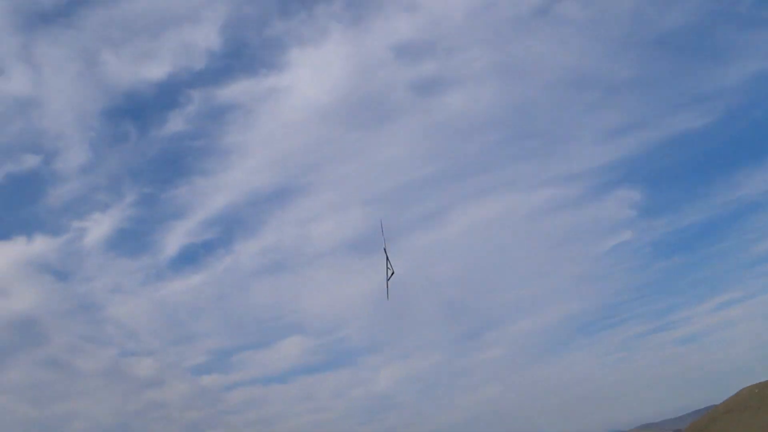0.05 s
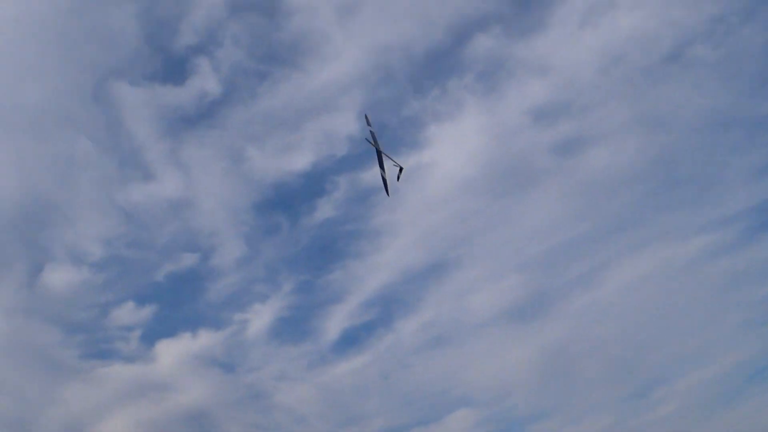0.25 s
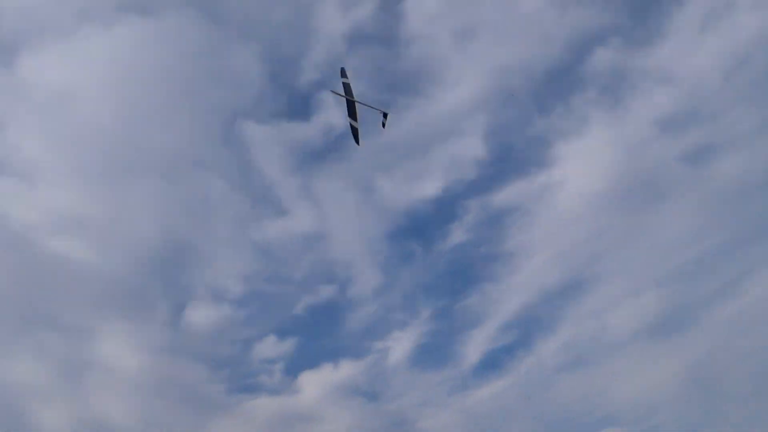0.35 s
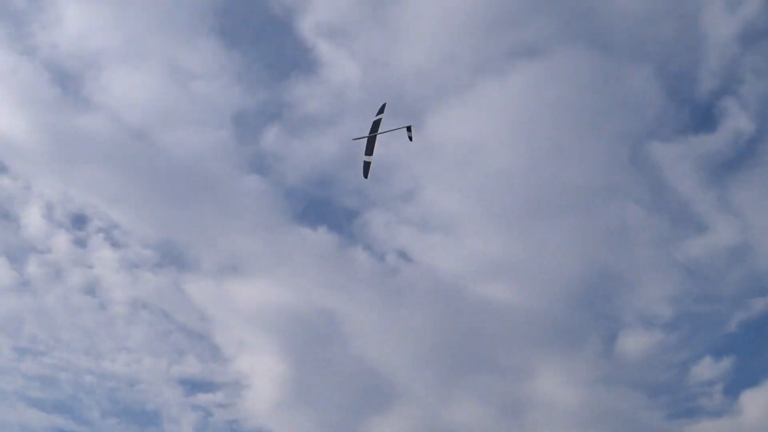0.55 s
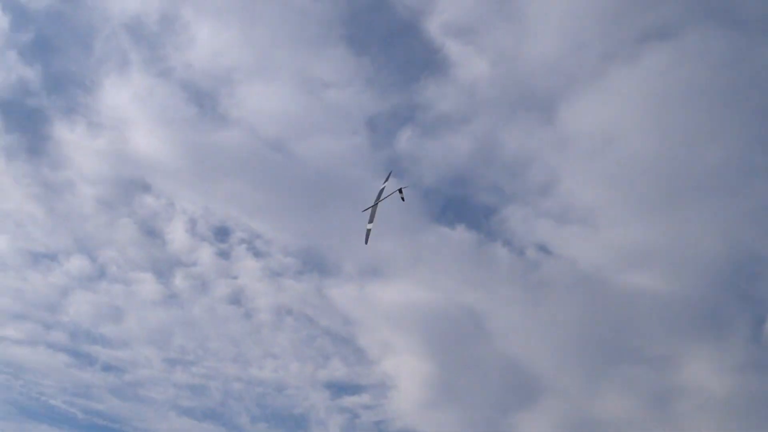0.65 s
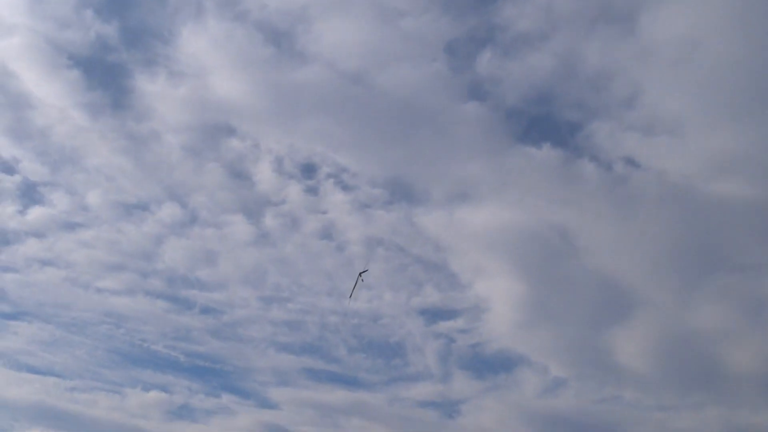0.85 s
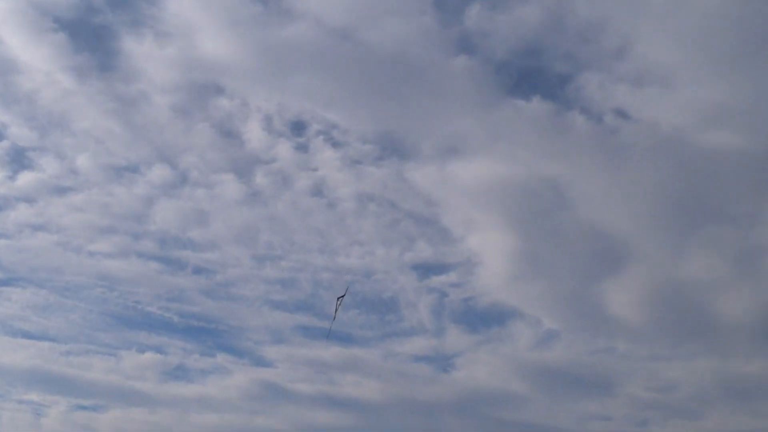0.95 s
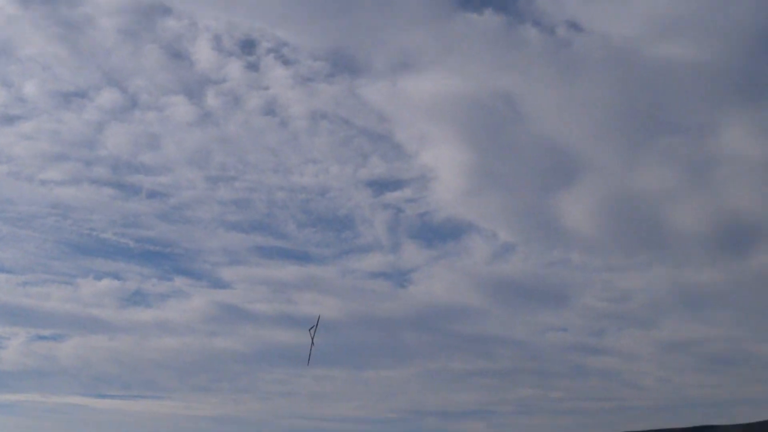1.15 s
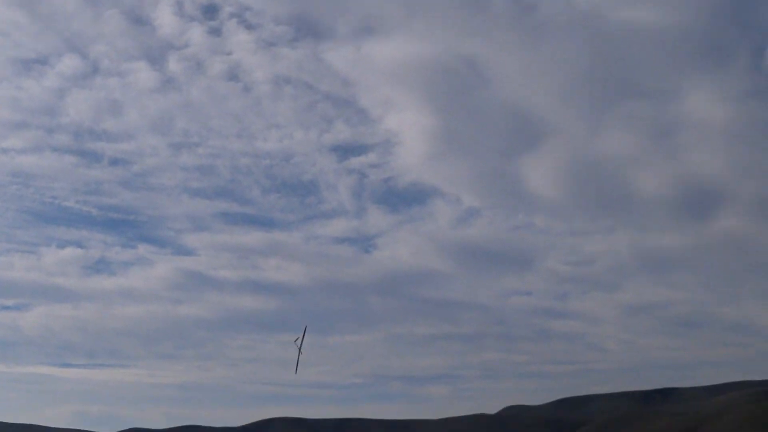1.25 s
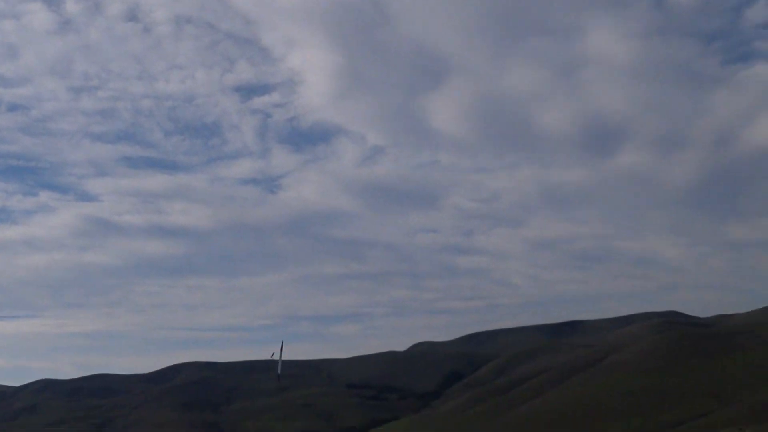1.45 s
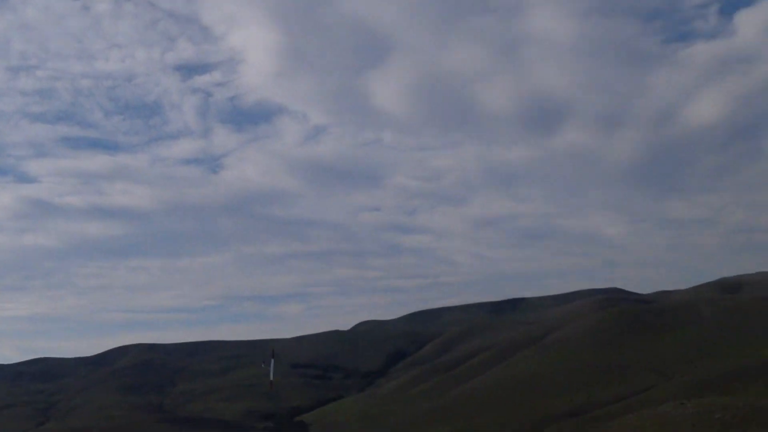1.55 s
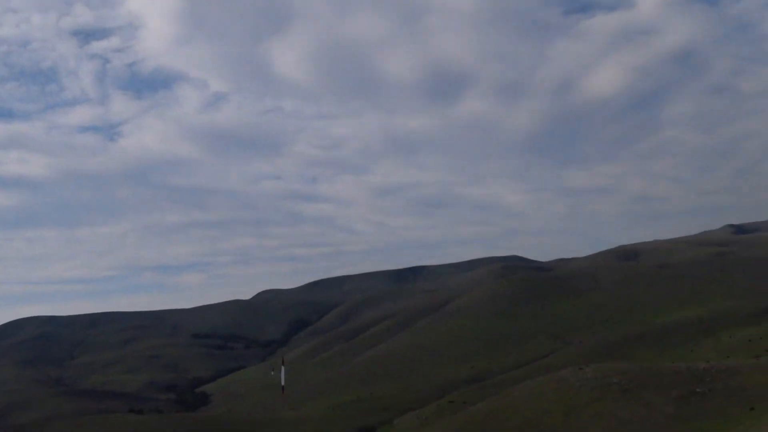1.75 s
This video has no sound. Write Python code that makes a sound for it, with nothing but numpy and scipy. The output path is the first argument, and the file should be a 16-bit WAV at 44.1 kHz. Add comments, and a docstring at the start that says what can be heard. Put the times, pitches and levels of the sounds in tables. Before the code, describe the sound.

A model glider sweeps close overhead with an airy hiss and faint whistles that sink in pitch and fade. Gusts flutter and thump on the microphone throughout, over soft hillside wind and a little rustling grass.

```python
"""A model glider sweeps close overhead: air hisses over its wings and rushes and whistles at their
edges, all sinking in pitch with the Doppler shift of the pass.
Gusts buffet the two microphone ports in short flutters, and single eddies thump on them.
Underneath lies a bed of wind on a grassy hill, with a few swells of rustling grass."""
import sys
import numpy as np
from scipy import signal
from scipy.fft import rfft, irfft
from scipy.io import wavfile
from scipy.ndimage import uniform_filter1d, map_coordinates

SR = 44100
rng = np.random.default_rng(int(sys.argv[2]) if len(sys.argv) > 2 else 0)


def wav_out(sig):
    """Save sig, one row per channel (or a flat mono array), as 16-bit PCM at SR to the path in sys.argv[1]."""
    wavfile.write(sys.argv[1], SR, np.round(np.clip(np.atleast_2d(sig).T, -1, 1) * 32767).astype(np.int16))


N = 79380

# wind bed: its envelope (t/s, level/dB), its tone and its stereo side EQ (f/Hz, level/dB)
WIND_LEVEL = [(0, -55), (.2, -54), (.6, -48), (.85, -54.5), (1, -50), (1.3, -52), (1.58, -52.5),
              (1.8, -54.5)]
WIND_SPECTRUM = [(25, -24), (80, -2), (200, -0.5), (500, -2), (950, 2), (1500, -3.5), (2200, -10),
                 (3000, -10.5), (5000, -19.5), (8000, -30.5), (12000, -29.5), (15500, -29)]
WIND_SIDE = [(60, -11), (250, 2.5), (700, -3), (2400, -3.5), (5000, -6), (15000, -11.5)]
# swells of rustling grass (t/s, half-length/s, swish level/dB, sizzle level/dB)
RUSTLES = [(1.124, 0.024, -58, -58.5), (1.228, 0.064, -63.5, -65.5), (1.46, 0.065, -83.5, -65),
           (1.695, 0.012, -61, -62), (1.75, 0.13, -53.5, -63)]
# the soft swish and the bright sizzle of the grass (f/Hz, level/dB)
SWISH_SPECTRUM = [(600, -28), (1200, 0), (2200, 5.5), (3400, 2), (5000, -2.5), (9000, -25)]
SIZZLE_SPECTRUM = [(2000, -23), (3500, 8.5), (6000, 1), (8000, 7), (11000, -1.5), (15000, -11)]
# gusts ahead of the port EQ (t/s, half-length/s, level/dB)
GUSTS = [(0.073, 0.031, -45.5), (0.203, 0.033, -47), (0.237, 0.0097, -35), (.288, 0.0025, -36.5),
         (0.314, 0.014, -41), (.372, 0.015, -36.5), (0.46, 0.02, -23), (0.519, 0.023, -34.5),
         (0.577, 0.0045, -35), (0.644, 0.0061, -38), (0.687, 0.003, -42), (0.642, 0.039, -45),
         (0.736, 0.018, -47), (0.89, 0.017, -47.5), (0.914, 0.0078, -30), (0.952, 0.015, -27.5),
         (1.002, 0.024, -38.5), (1.038, 0.0087, -34.5), (1.065, 0.011, -36.5), (1.101, 0.011, -31.5),
         (1.154, 0.014, -32), (1.204, 0.018, -35.5), (1.242, 0.033, -47), (1.351, 0.0055, -35.5),
         (1.355, 0.055, -46.5), (1.487, 0.014, -37.5), (1.516, 0.01, -36), (1.806, 0.045, -44.5)]
# single eddies ahead of the port EQ (t/s, peak level/dB, width/ms)
THUMPS = [(.241, -26, 0.89), (0.4295, -10.5, 0.43), (.4485, -13.5, 0.6), (.46, -3.5, 0.14),
          (.4626, -11, 0.1), (0.467, -3, 0.12), (.472, -9, 0.33), (0.4868, -14, 0.76), (.576, -22, 0.85),
          (.645, -31, 0.91), (0.929, -19, .55), (.939, -11, 0.4), (.9645, -8.5, 0.31), (1.045, -29, .5),
          (1.079, -22, .4), (1.1491, -20, 0.77), (1.1567, -8.5, 0.39), (1.1634, -16.5, 0.36),
          (1.25, -29.5, 0.72), (1.35, -17, 1.15), (1.49, -23, 0.55), (1.512, -22.5, 0.45)]
# port EQ for the buffeting, and its stereo side EQ (f/Hz, level/dB)
PORT_EQ = [(20, -27), (50, -22), (110, -5.5), (250, 0.5), (600, 2), (1500, -6), (2500, -13), (4000, -31),
           (8000, -40)]
PORT_SIDE = [(50, -3), (120, -4.5), (200, 0.5), (380, 7.5), (700, 9), (1300, 10.5), (2400, 6), (4400, 4)]
# pitch bend of the pass (t/s, pitch ratio)
DOPPLER = [(0, 1.2), (.15, 1.17), (.3, 1.1), (.4, 1.03), (.5, .97), (.6, .92), (.7, .87), (.8, .825),
           (.9, .8), (1, .79), (1.8, .77)]
# envelopes of the air over the wings (t/s, hiss level/dB, edge rush level/dB)
WING_LEVELS = [(0, -52.5, -46), (.06, -58, -53.5), (.108, -53.5, -47), (.14, -42.5, -48), (.26, -43, -40.5),
               (.37, -40.5, -45.5), (.5, -48, -46), (.58, -44.5, -49), (.7, -53, -52), (.77, -52, -55),
               (.85, -57.5, -62), (.98, -62.5, -60), (1.06, -63, -58.5), (1.33, -84, -67), (1.8, -80, -70)]
# fixed colour laid on the wing hiss after the bend, so its peaks stay put (f/Hz, level/dB)
HISS_SPECTRUM = [(300, -1), (900, -5), (1700, -14), (4000, 2), (5000, -1), (6700, 1), (8400, -4.5),
                 (10200, -6), (12000, -11.5), (15000, -25)]
# tone of the edge rush before the bend (f/Hz, level/dB)
RUSH_SPECTRUM = [(1200, -17), (1900, -8.5), (2300, 2.5), (2950, 2), (3300, -1.5), (3700, -12), (4300, -8.5),
                 (7000, -50)]
# edge whistles before the bend (f/Hz, width/Hz, level/dB, start/s, end/s)
WHISTLES = [(3026, 139.3, -42, 0.355, 0.477), (3014, 121, -47, 0.16, 0.773), (3730, 43, -54.5, 0.5, 1),
            (3630, 112, -50, 0.28, 0.62), (4520, 43, -56.5, 0.49, 0.793), (2377, 22, -55, 0.63, 0.992),
            (2305, 98, -50.5, 0.19, 0.39), (2740, 102, -52, 0.46, 0.7), (1720, 49, -55.5, 0.396, 0.6),
            (6770, 240, -54.5, 0.24, 0.65), (6050, 110, -56, 0.27, 0.61), (7820, 207, -61.5, 0.27, 0.83),
            (2640, 280, -48, 0.067, 0.15), (3050, 50, -59.5, 0.65, 0.9), (2326, 53, -48.5, 0.73, 0.74),
            (2640, 108.7, -59.5, .99, 1.09), (2800, 270, -60, 1.244, 1.326)]
# stereo side EQ of the glider (f/Hz, level/dB)
GLIDER_SIDE = [(200, -4), (1000, 3), (2000, 0), (3000, -6), (4000, -13.5), (7000, -20), (15000, -57)]


def undb(db):
    """Decibels to gain."""
    return 10 ** (np.asarray(db) / 20)


def unit(x):
    """Scale to rms 1."""
    return x / np.sqrt(np.mean(x ** 2))


def curve(table, column=1):
    """An automation lane: one table column, joined by straight lines in time."""
    rows = np.array(table)
    return np.interp(np.arange(N) / SR, rows[:, 0], rows[:, column])


def swell(at, half):
    """A bell-shaped rise and fall."""
    return np.exp(-.5 * ((np.arange(N) / SR - at) / half) ** 2)


def arch(start, end):
    """A round-shouldered fade in from silence and back out."""
    progress = np.clip((np.arange(N) / SR - start) / (end - start), 0, 1)
    return np.abs(np.sin(np.pi * progress)) ** 0.68


def bins():
    """Frequencies of the spectrum, floored at 1 Hz."""
    return np.maximum(np.arange(N // 2 + 1) * SR / N, 1)


def colour(x, points):
    """EQ through (f/Hz, level/dB) points."""
    hz, db = np.array(points).T
    gain = undb(np.interp(np.log(bins()), np.log(hz), db))
    return irfft(rfft(x) * gain, N)


def noise(points):
    """Coloured noise of rms 1."""
    return unit(colour(rng.standard_normal(N), points))


def band(hz, width):
    """Narrow noise of rms 1."""
    white = rfft(rng.standard_normal(N))
    return unit(irfft(white / (1 + (2 * (bins() - hz) / width) ** 2), N))


def drift(rate_hz):
    """Smooth random modulation with a spread near 1."""
    hold = int(SR / rate_hz)
    steps = np.repeat(rng.standard_normal(1024)[:N // hold + 1], hold)
    return 1.3 * uniform_filter1d(uniform_filter1d(steps, hold), hold)[:N]


def spread(mid, difference, side_eq):
    """Left and right of two close ports: their difference is turned a quarter cycle and EQ'd."""
    side = colour(signal.hilbert(difference).imag, side_eq)
    return np.array([mid + side, mid - side])


def wind_in_grass(drift_db=1.8):
    """The bed: wind over the hill, with swells of rustling grass nearby."""
    bed = noise(WIND_SPECTRUM) * undb(curve(WIND_LEVEL) + drift_db * drift(11.76))
    swish, sizzle = noise(SWISH_SPECTRUM), noise(SIZZLE_SPECTRUM)
    for at, half, swish_db, sizzle_db in RUSTLES:
        bed += swell(at, half) * (undb(swish_db) * swish + undb(sizzle_db) * sizzle)
    return bed


def gusts(cutoff_hz=599, reference_db=-35.5, db_per_doubling=12.5, flutter_db=2):
    """Turbulence on each port; the harder it blows, the smaller and brighter the eddies."""
    force = np.sqrt(sum((undb(db) * swell(at, half)) ** 2 for at, half, db in GUSTS) + 1e-9)
    cutoff = cutoff_hz * 2 ** ((20 * np.log10(force) - reference_db) / db_per_doubling)
    # a moving low-pass at constant power, built from half-octave bands
    centres = 35 * 2 ** np.arange(0, 7, .5)
    masks = [np.abs(np.log2(bins() / hz)) < 1 / 4 for hz in centres]
    weights = np.array([np.sqrt(hz) / (1 + (hz / cutoff) ** 4.02) for hz in centres])
    weights /= np.sqrt(np.sum(weights ** 2, axis=0))
    ports = []
    for _ in range(2):
        white = rfft(rng.standard_normal(N))
        eddies = sum(weight * unit(irfft(white * mask, N)) for weight, mask in zip(weights, masks))
        ports.append(eddies * force * undb(flutter_db * drift(180)) / np.sqrt(2))
    return np.array(ports)


def thumps():
    """Single eddies: sharp suction pulses, each on one of the two ports at random."""
    t, ports = np.arange(N) / SR, np.zeros((2, N))
    for (at, db, width_ms), port in zip(THUMPS, rng.integers(0, 2, len(THUMPS))):
        x = (t - at) * 1000 / width_ms
        ports[port] -= undb(db) * (1 - x ** 2) / (1 + x ** 2) ** 2
    return ports


def doppler(x):
    """Varispeed that bends a sound down in pitch as the glider passes."""
    position = np.cumsum(curve(DOPPLER))
    return map_coordinates(x, [position], order=5, mode="grid-wrap")


def wing_hiss(ripple_db=2.4, spacing_hz=130):
    """Air over the wings: noise rippled by many faint, narrow resonances that slide down."""
    ripple = np.interp(bins(), np.arange(256) * spacing_hz, rng.standard_normal(256))
    rippled = irfft(rfft(rng.standard_normal(N)) * undb(ripple_db * ripple), N)
    return unit(colour(doppler(rippled), HISS_SPECTRUM))


def edge_whistle(hz, width, skirt_db=-3.5):
    """Air whistling at a wing edge: a wavering, sinking tone in a breathy skirt of noise."""
    pitch = curve(DOPPLER) * (hz + width / 2 * drift(160))
    tone = np.sqrt(2) * np.sin(2 * np.pi * np.cumsum(pitch) / SR)
    return tone + undb(skirt_db) * doppler(band(hz, 3 * width))


def glider(flutter_db=1.0, waver_db=2.3, pan_right_db=0.6):
    """The fly-by: wing hiss, edge rush and whistles, all riding one Doppler bend."""
    air = wing_hiss() * undb(curve(WING_LEVELS, column=1) + flutter_db * drift(45.6))
    edge_rush = doppler(noise(RUSH_SPECTRUM))
    air += edge_rush * undb(curve(WING_LEVELS, column=2) + flutter_db * drift(45.7))
    for hz, width, db, start, end in WHISTLES:
        air += edge_whistle(hz, width) * arch(start, end) * undb(db + waver_db * drift(70))
    balance = undb([[-pan_right_db / 2], [pan_right_db / 2]])
    return spread(air, -air, GLIDER_SIDE) * balance


def scene():
    """The mix: the glider over the hillside bed, with wind buffeting the ports."""
    left, right = (colour(port, PORT_EQ) for port in gusts() + thumps())
    buffeting = spread(left + right, left - right, PORT_SIDE)
    fly_by = glider()
    hillside = spread(wind_in_grass(), wind_in_grass(), WIND_SIDE)
    return fly_by + hillside + buffeting


def record(dry):
    """A hard clip just under full scale, then a steep high cut at 15.6 kHz."""
    high_cut = signal.ellip(10, .1, 80, 15600, fs=SR, output="sos")
    return signal.sosfilt(high_cut, np.clip(dry, -.95, .95))


dry = scene()
out = record(dry)
wav_out(out)
```